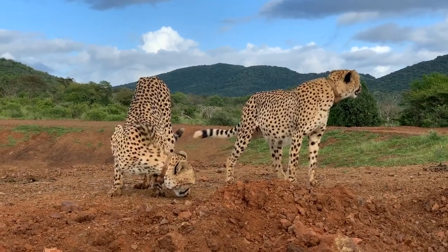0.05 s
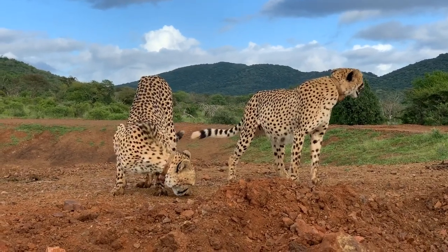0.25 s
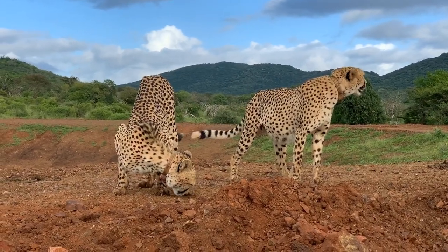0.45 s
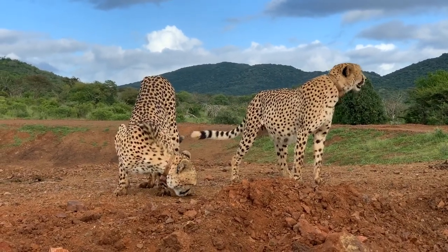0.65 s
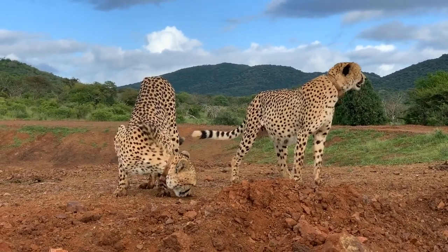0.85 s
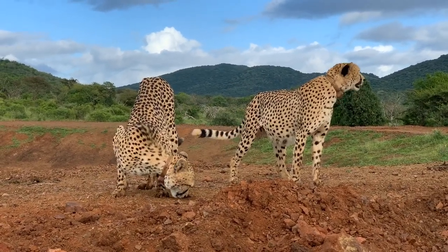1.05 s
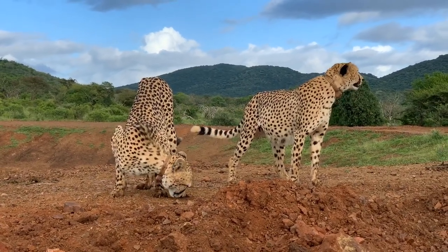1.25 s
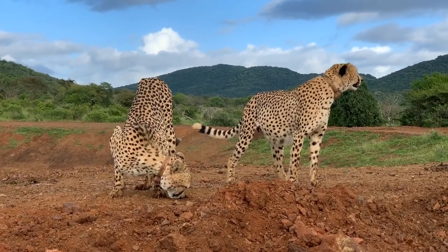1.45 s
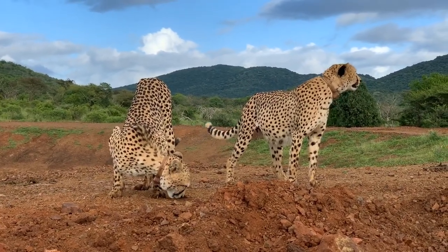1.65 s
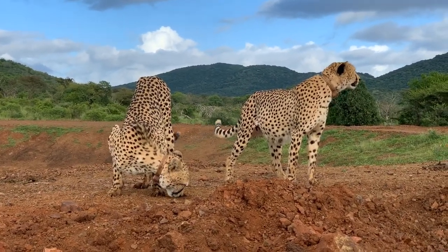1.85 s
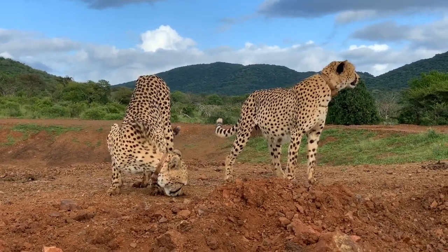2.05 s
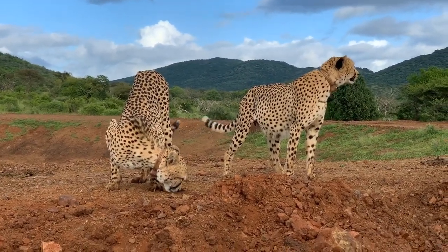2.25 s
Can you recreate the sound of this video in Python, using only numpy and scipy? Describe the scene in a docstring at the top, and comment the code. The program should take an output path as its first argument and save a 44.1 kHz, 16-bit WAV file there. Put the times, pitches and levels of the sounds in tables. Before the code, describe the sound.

Close stereo microphone outdoors: one bright cheetah chirp sliding down, then a muffled, throaty stutter that swells and fades. Faint birds twitter throughout, a clearer whistle follows, with soft wind rumble and bush hiss.

```python
"""Cheetah on open bush land

A cheetah a few metres off gives one falling chirp, overtones through an open throat with breath puffed
each cycle, then a closed-mouth stutter of chest tone, arching octave and raspy pulses. An earth bank
echoes it and the land scatters it. Near-sine birds whistle near and far over faint short tones placed at
random, a tick sounds on the ground, and filtered noise makes low wind rumble, a soft rustle and a faint
hiss of the bush."""
import sys
import numpy as np
from scipy import signal
from scipy.fft import rfft, irfft
from scipy.io import wavfile
from scipy.ndimage import uniform_filter1d

SR = 44100
rng = np.random.default_rng(int(sys.argv[2]) if len(sys.argv) > 2 else 0)


def output_pcm(signal):
    """Save a mono or channel-first signal as 16-bit PCM at the path in sys.argv[1].

    Samples are clipped to [-1, 1] before scaling.
    """
    pcm = np.clip(np.atleast_2d(signal).T, -1, 1) * 32767
    wavfile.write(sys.argv[1], SR, np.round(pcm).astype(np.int16))


N = 101429
T = np.arange(N) / SR
TOP_HZ = 14250  # upper limit of the voice's overtones and of the final sound


def undb(db):
    """dB to gain."""
    return 10 ** (np.asarray(db) / 20)


def unit(x):
    """Scale to rms 1."""
    return x / np.sqrt(np.mean(x ** 2))


def curve(table, col, x=T):
    """Straight lines through one column, read against the first."""
    a = np.array(table, float)
    return np.interp(x, a[:, 0], a[:, col])


def ring(x, hz, width_hz):
    """One resonance, gain 1 at its centre."""
    return signal.lfilter(*signal.iirpeak(hz, hz / width_hz, fs=SR), x)


def walk(rate):
    """Slow chance, rms 1: noise smoothed twice over 1/rate seconds."""
    k = int(SR / rate)
    smooth = uniform_filter1d(rng.standard_normal(N), k)
    return unit(uniform_filter1d(smooth, k))


def log_spectrum():
    """Log frequency of each spectrum bin, held at 1 Hz or above."""
    return np.log(np.maximum(np.fft.rfftfreq(N, 1 / SR), 1))


def colour(x, table):
    """Shape by (Hz, dB) points on a log-frequency axis."""
    a = np.array(table, float)
    gain_db = np.interp(log_spectrum(), np.log(a[:, 0]), a[:, 1])
    return irfft(rfft(x) * undb(gain_db), N)


def band(hz, width_hz):
    """Noise through the same resonance twice, rms 1."""
    return unit(ring(ring(rng.standard_normal(N), hz, width_hz), hz, width_hz))


# Tone of the bush hiss, before it is set to BUSH_DB [f/Hz, relative level/dB]
BUSH_TONE = [(25, -20), (65, -2.5), (338, -25), (1360, -33), (1760, -37), (3620, -30), (6900, -44.5),
             (14200, -43.5)]
# Wind rumble before gusts [t/s, deep level/dB, upper level/dB]
WIND_RUMBLE = [(0, -69, -94.5), (1.45, -69.5, -72), (2.05, -69, -97.5), (2.19, -67.5, -65)]
# One soft rustle [t/s, level/dB]
SOFT_RUSTLE = [(1.62, -106.5), (1.782, -81), (2.12, -86.5)]
BUSH_DB, GUST_DB = -73.5, 3  # hiss level before its flicker; rms of the gusts' level swing
TREBLE_SWELL_S, TREBLE_SWELL_WIDTH_S, TREBLE_SWELL_DB = 1.27, 0.12, -88.5  # peak time, width, peak level


def bush():
    """Coloured noise flickering around 3.9 kHz, gusty low bands, a soft rustle and one swell of treble."""
    hiss = unit(colour(rng.standard_normal(N), BUSH_TONE)) * undb(BUSH_DB)
    flicker = undb(2.5 * walk(6)) - 1
    hiss = hiss + flicker * ring(hiss, 3900, 2500)
    rustling = (T > SOFT_RUSTLE[0][0]) * (T < SOFT_RUSTLE[-1][0])
    rustle = undb(curve(SOFT_RUSTLE, 1)) * rustling * band(1015, 800)
    bump = np.exp(-((T - TREBLE_SWELL_S) / TREBLE_SWELL_WIDTH_S) ** 2)
    swell = undb(TREBLE_SWELL_DB) * bump * band(9000, 4000)
    deep = undb(curve(WIND_RUMBLE, 1)) * band(68, 30)
    upper = undb(curve(WIND_RUMBLE, 2)) * band(150, 87)
    return hiss + (deep + upper) * undb(GUST_DB * walk(12)) + rustle + swell


# Small ticks on the ground [t/s, burst level before the resonances/dB]
GROUND_TICKS = [(1.777, -45)]


def ticks():
    """Dry ticks: a very short noise burst ringing two bands."""
    bursts = sum(undb(db) * np.exp(-abs(T - s) / 0.00016) for s, db in GROUND_TICKS)
    bursts = bursts * rng.standard_normal(N)
    return ring(bursts, 1060, 900) + 0.22 * ring(bursts, 7800, 1500)


def whistle(start, hz, db):
    """A sine placed in time; its pitch and rms level run per sample."""
    out = np.zeros(N)
    i = int(start * SR) + np.arange(len(hz))
    ok = (i >= 0) & (i < N)
    sine = np.sin(2 * np.pi * np.cumsum(hz) / SR)
    out[i[ok]] = (np.sqrt(2) * undb(db) * sine)[ok]
    return out


def glide(start, length, hz0, hz1, db):
    """A bird note sliding ever faster between two pitches, with soft ends."""
    u = np.linspace(0, 1, int(length * SR))
    hz = hz0 + (hz1 - hz0) * u * (1 + u) / 2
    return whistle(start, hz, db + 14 * np.log10(abs(np.sin(np.pi * u)) + 1e-4))


def arch(start, length, hz, db):
    """A short tone that rises to its top and falls back."""
    u = np.linspace(-1, 1, int(length * SR) + 2)[1:-1]
    return whistle(start, hz * (1 - .13 * u ** 2), db + 10 * np.log10(1 - u ** 2))


def line(table, waver):
    """A bird following a (s, Hz, dB) curve; waver is the share by which pitch strays."""
    t = np.arange(table[0][0], table[-1][0], 1 / SR)
    hz = uniform_filter1d(curve(table, 1, t), size=150)
    return whistle(t[0], hz * (1 + waver * walk(60)[:len(t)]), curve(table, 2, t))


# Far-bird levels are before the shared waver; note levels are those at mid-note.
# Hooked whistles [start t/s, level/dB]
HOOKED_NOTES = [(0.867, -78), (1.024, -76.5), (1.17, -76), (1.309, -78)]
# Their quick rise and slow fall [t/s from the start, f/Hz]
HOOK_PITCH = [(0, 4090), (.012, 4730), (.035, 4620), (.09, 3525)]
# Gliding notes [start t/s, length t/s, from f/Hz, to f/Hz, level/dB]
GLIDING_NOTES = [(-.02, 0.042, 3586, 2960, -75.5), (0.768, 0.021, 6700, 5600, -80.5),
                 (0.847, 0.044, 4490, 3500, -77), (0.89, 0.076, 3117, 2880, -77),
                 (0.997, 0.076, 3188, 3050, -74), (1.727, 0.099, 6020, 4760, -79),
                 (2.08, 0.2, 5300, 3640, -83), (2.264, 0.078, 5736, 5500, -64)]
# Up-and-down notes [start t/s, length t/s, top f/Hz, level/dB]
ARCHED_NOTES = [(1.234, 0.11, 6440, -80.5), (1.848, .032, 5940, -79)]
# A far bird's long wavering line [t/s, f/Hz, level/dB]
WAVERING_LINE = [(.385, 2830, -74), (.41, 3400, -80), (.46, 3727, -83.5), (.69, 3667, -93.5),
                 (.775, 2820, -86.5)]
SCATTERED_COUNT, SCATTERED_HZ, SCATTERED_DB = 220, 2900, -92  # tops lie from SCATTERED_HZ to an octave up


def far_birds():
    """Hooked, gliding, arched and wavering notes, and faint random arched tones, in a shared level waver."""
    u = np.arange(0, HOOK_PITCH[-1][0], 1 / SR)
    hook_hz = curve(HOOK_PITCH, 1, u)
    soft_db = 10 * np.log10(abs(np.sin(np.pi * u / u[-1])) + 1e-4)
    far = sum(whistle(start, hook_hz, db + soft_db) for start, db in HOOKED_NOTES)
    far = far + sum(glide(*note) for note in GLIDING_NOTES)
    far = far + sum(arch(*note) for note in ARCHED_NOTES) + line(WAVERING_LINE, .015)
    # faint scattered short rising-and-falling tones, placed at random
    far = far + sum(arch(when * N / SR, 0.024, SCATTERED_HZ * (1 + lift), SCATTERED_DB)
                    for when, lift in rng.random((SCATTERED_COUNT, 2)))
    return far * undb(4 * walk(60))


# Near bird [t/s, f/Hz, level/dB]
NEAR_WHISTLE = [(1.822, 4630, -83), (1.86, 4330, -61.5), (1.91, 4065, -70), (2.05, 3938, -72),
                (2.1, 3940, -61), (2.128, 4360, -70.5), (2.145, 4490, -85)]


def near_bird():
    """One close whistle: a steady sine following its pitch and level curve."""
    return line(NEAR_WHISTLE, 0)


# Stutter notes [start t/s, length t/s, level/dB, f/Hz, arching tone level/dB, mouth level/dB]
# the last two levels are relative to the note
STUTTER_NOTES = [(1.044, 0.013, -62.5, 421, -14.5, -16.5), (1.081, 0.038, -54, 372, -14, -15),
                 (1.144, 0.028, -50, 418.2, -16, -10), (1.201, 0.025, -48.5, 425, -18, -16.5),
                 (1.261, 0.022, -49, 403.5, -15, -10.5), (1.321, .028, -51, 371.2, -11, -10),
                 (1.382, .029, -51.5, 380.4, -10, -9), (1.444, 0.039, -53, 361, -9, -4),
                 (1.512, 0.045, -63.5, 338.6, -0.5, -9), (1.561, 0.022, -72.5, 400, -16, -7.5)]
# Closed-mouth resonances, mouth then nose [f/Hz, width f/Hz]
MOUTH_AND_NOSE = [(1230, 220), (2200, 535)]
NOTE_SKEW, NOTE_ROUND = 0.64, 0.58  # envelope shape: lower skew peaks earlier, lower round is fuller
ARCH_DROP = 0.47  # share by which the arching tone starts and ends low
NOTE_JITTER, RASP, NOSE_DB = 0.0301, 4.1, -22.5  # rms share of pitch; noise against pulses; relative level
CHEST_HZ, CHEST_WIDTH_HZ = 382, 180


def stutter():
    """Rounded notes: a clean chest tone, a tone that arches up to its octave, raspy pulses in the mouth."""
    out, wobble, noise = np.zeros(N), walk(460), rng.standard_normal(N)
    for start, length, db, hz, arch_db, mouth_db in STUTTER_NOTES:
        u = ((T - start) / length).clip(0, 1)
        env = abs(np.sin(np.pi * u ** NOTE_SKEW)) ** NOTE_ROUND * (u < 1)
        tone = env * np.sin(2 * np.pi * hz * (T - start))
        chest = 2 * ring(tone, CHEST_HZ, CHEST_WIDTH_HZ) + tone
        rough_hz = hz * (1 + NOTE_JITTER * wobble)
        arched_hz = rough_hz * (1 - ARCH_DROP * (2 * u - 1) ** 2)
        octave = np.sqrt(env) * np.sin(4 * np.pi * np.cumsum(arched_hz) / SR)
        phase = 2 * np.pi * np.cumsum(rough_hz) / SR
        pulses = sum(np.cos(k * phase) for k in range(2, 9))
        pulses = env * (pulses + RASP * noise * (1 + np.cos(phase)))
        muffled = sum(2 * undb(level) * ring(ring(pulses, f, w), f, w)
                      for level, (f, w) in zip([mouth_db, NOSE_DB], MOUTH_AND_NOSE))
        out += undb(db) * (chest + 2 * undb(arch_db) * octave + muffled)
    return out


# Falling chirp [t/s, f/Hz, effort level/dB]
CHIRP_PITCH_EFFORT = [(.186, 935, -77.5), (.202, 1003, -54), (.22, 1051, -43), (.236, 1041, -41.5),
                      (.262, 847, -38.5), (.282, 741.6, -35.5), (.32, 597.6, -43), (.346, 450, -54),
                      (.358, 480, -69)]
# Open throat seen by the overtones and breath [f/Hz, gain level/dB]
OPEN_THROAT = [(430, -3), (540, 2.5), (620, -27), (850, -11.5), (1050, -15.5), (1200, 3.5), (1900, 1),
               (2600, -13.5), (4200, -15.5), (4800, -37.5), (5600, -23), (7200, -47), (12500, -27)]
# Tilt of the overtones above the second as the mouth moves [t/s, level/dB per octave]
MOUTH_TILT = [(.2, -13.5), (.245, -3), (.296, -6.5), (.312, -35)]
CHIRP_JITTER, OVERTONE_WAVER_DB = .003, 2.0  # rms share of pitch; level waver, grows with overtone number
OVERTONE_BLUR, BREATH_DB = .3, -3  # phase wander (rad per overtone, more as pitch falls); breath gain


def chirp():
    """Overtones of a falling pitch sweep through a fixed throat, with breath puffed once a cycle."""
    hz = uniform_filter1d(curve(CHIRP_PITCH_EFFORT, 1), size=200) * (1 + CHIRP_JITTER * walk(140))
    phase = 2 * np.pi * np.cumsum(hz) / SR
    throat = [(np.log(f), db) for f, db in OPEN_THROAT]
    tilt_db = curve(MOUTH_TILT, 1)
    blur = OVERTONE_BLUR * (hz.max() / hz) ** 2
    voice = np.zeros(N)
    for k in range(1, 31):
        waver_db = OVERTONE_WAVER_DB * min((k - 1) ** 2 / 2, 2) * walk(90)
        level_db = curve(throat, 1, np.log(k * hz)) + waver_db + tilt_db * np.log2(max(k / 2, 1))
        wander = blur * max(k - 2, 0) * walk(340)
        voice += undb(level_db) * (k * hz < TOP_HZ) * np.sin(k * phase + k * k + wander)
    puffs = np.gradient(rng.standard_normal(N)) * (1 + np.cos(phase))
    breath = colour(puffs, OPEN_THROAT) * undb(BREATH_DB)
    first, last = CHIRP_PITCH_EFFORT[0][0], CHIRP_PITCH_EFFORT[-1][0]
    on = np.interp(T, [first - .01, first, last, last + .01], [0, 1, 1, 0])
    return on * undb(curve(CHIRP_PITCH_EFFORT, 2)) * (np.sqrt(2) * voice + breath)


ECHO_S, ECHO_DB, ECHO_HZ = 0.049, -26, 1300  # delay, gain at the band centre, band centre


def bank_echo(cat):
    """The earth bank returns the call once, late and in one band."""
    return undb(ECHO_DB) * ring(np.interp(T - ECHO_S, T, cat), ECHO_HZ, 640)


SCATTER_DB, SCATTER_T60_S = -11.5, 0.18  # gain of the tails, time to fall 60 dB


def land_scatter(x):
    """Many small reflections: a separate decaying noise tail of set energy for each channel."""
    t = T[:SR // 2]
    decay = np.exp(-np.log(1000) * t / SCATTER_T60_S)
    tails = [unit(rng.standard_normal(len(t)) * decay) / np.sqrt(len(t)) for _ in range(2)]
    return np.array([signal.fftconvolve(x, tail)[:N] for tail in tails]) * undb(SCATTER_DB)


# Microphone ports [f/Hz, left lead/rad, left minus right level/dB]
PORT_OFFSETS = [(300, -.55, -.5), (650, -1.05, -3.5), (5500, -1, -.5), (8500, -2.4, -.5), (13000, -1.5, 0)]


def ports(x):
    """Two microphone ports differ in phase and level by frequency."""
    offsets = [(np.log(f), lead, db) for f, lead, db in PORT_OFFSETS]
    f = log_spectrum()
    half = np.exp(.5j * curve(offsets, 1, f)) * undb(curve(offsets, 2, f) / 2)
    pair = np.array([half, 1 / half]) / (abs(half + 1 / half) / 2)  # keeps the mono sum's level
    return irfft(rfft(x) * pair, N)


ALIKE = 0.87  # share of bush power common to both channels before the ports


def scene():
    """Cat with echo and scatter from the land, birds, ticks and bush."""
    cat = chirp() + stutter()
    song = near_bird() + far_birds()
    scatter = land_scatter(cat + 3.1 * song)
    floor = np.sqrt(ALIKE) * bush() + np.sqrt(1 - ALIKE) * np.array([bush(), bush()])
    return ports(cat + bank_echo(cat) + song + ticks() + floor) + scatter


def record(dry):
    """The top is cut steeply."""
    return signal.sosfilt(signal.ellip(12, .2, 80, TOP_HZ, fs=SR, output="sos"), dry)


dry = scene()
out = record(dry)
output_pcm(out)
```